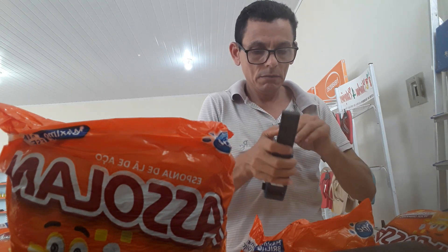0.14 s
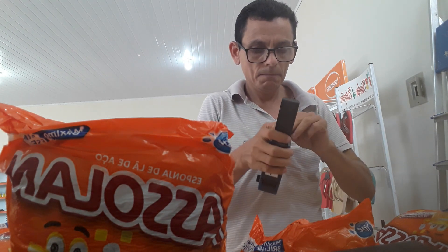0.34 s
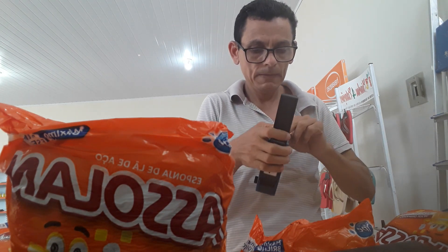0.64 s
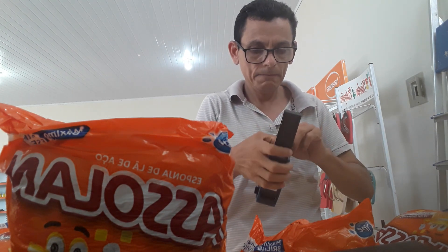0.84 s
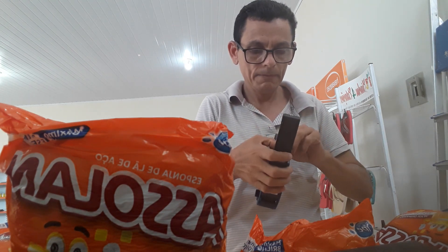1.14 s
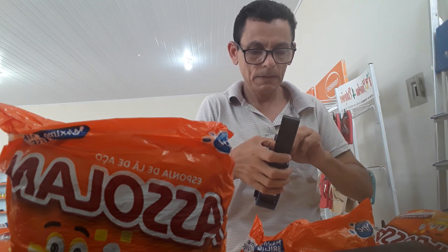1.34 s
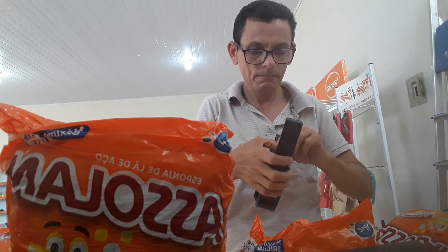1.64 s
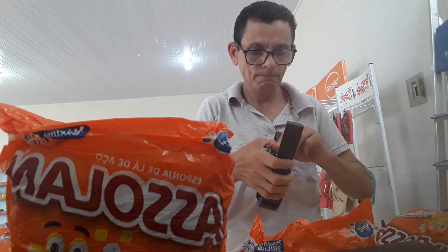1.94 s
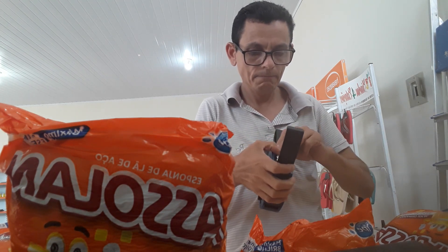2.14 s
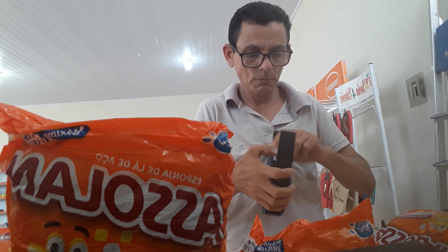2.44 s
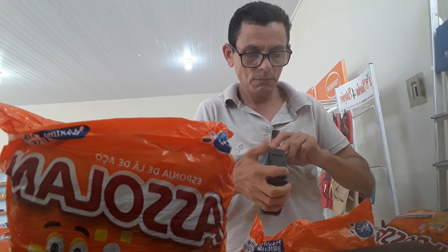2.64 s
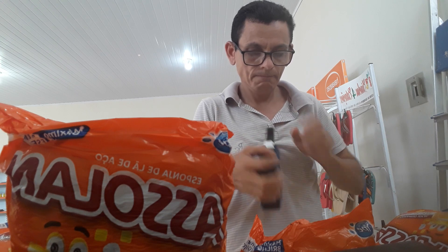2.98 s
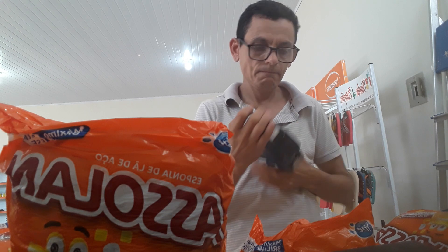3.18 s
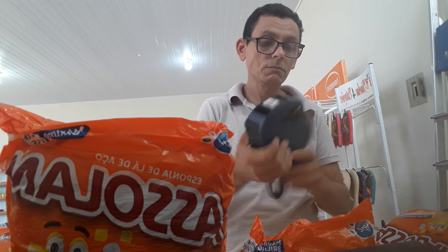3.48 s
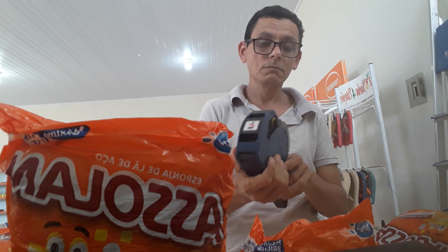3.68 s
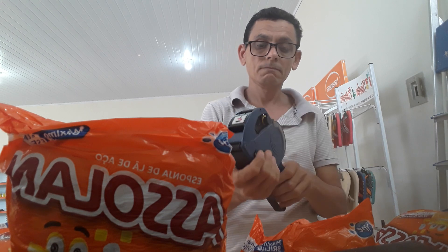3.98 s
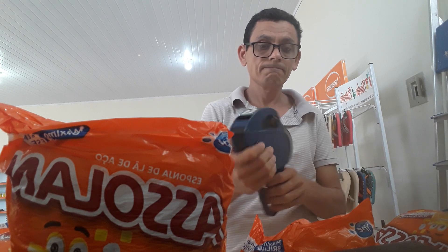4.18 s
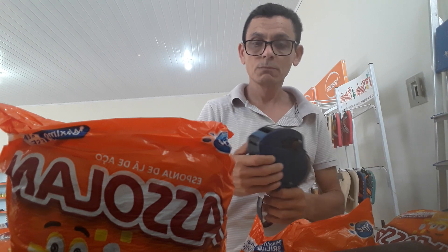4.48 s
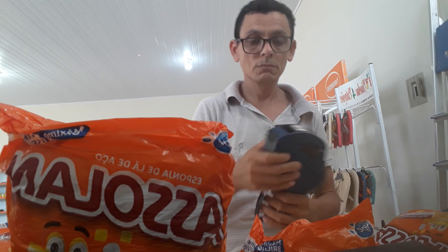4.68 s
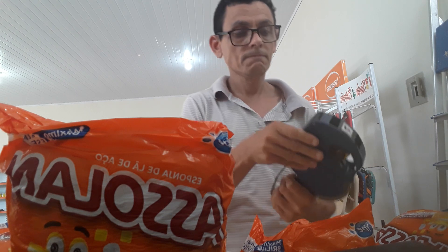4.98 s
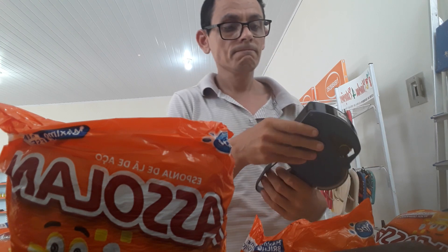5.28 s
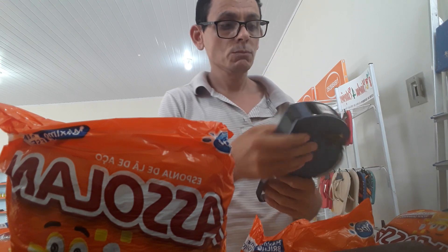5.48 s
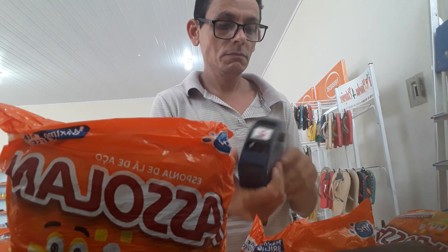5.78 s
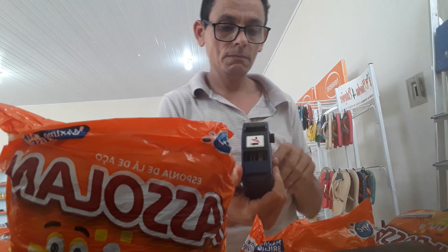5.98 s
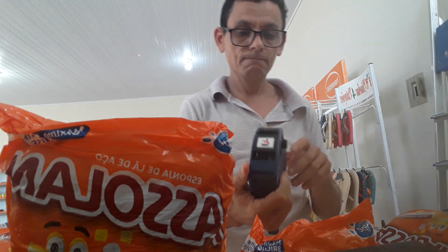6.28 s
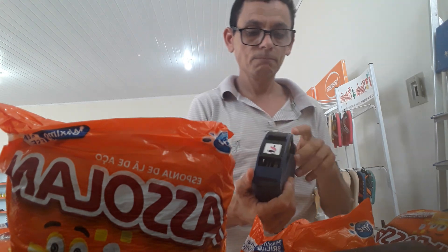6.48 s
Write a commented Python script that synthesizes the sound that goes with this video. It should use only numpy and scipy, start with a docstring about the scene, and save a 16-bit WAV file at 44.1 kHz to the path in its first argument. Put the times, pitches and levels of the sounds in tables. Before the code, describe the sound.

Light plastic clicks and two hard snaps from a handheld labeller indoors, while a small bird chirps and a car draws near outside.

```python
"""A plastic labelling gun is worked by hand in a small shop, over a steady rumble from the street.
A small bird starts to chirp, something whistles faintly far off, and the label roll ticks as it is pushed home.
At 2.9 s the casing snaps hard and sets a spring shivering; a few knocks follow as the gun is turned over.
At 5 s it snaps again. Each contact is a burst of chatter that rings the casing's modes.
Meanwhile a car draws near, its tyres roaring and hissing, and reaches the doorway at the end."""
import sys
import numpy as np
from scipy import signal
from scipy.fft import rfft, irfft, next_fast_len
from scipy.io import wavfile
from scipy.ndimage import uniform_filter1d, map_coordinates

SR = 44100
rng = np.random.default_rng(int(sys.argv[2]) if len(sys.argv) > 2 else 0)


def to_wav(sig):
    """Store sig (one row per channel, or 1-D mono) as 16-bit WAV at the path in sys.argv[1].

    Samples outside -1..1 are clipped; the rate is SR.
    """
    pcm = np.clip(np.atleast_2d(sig), -1, 1) * 32767
    pcm = np.round(pcm).astype(np.int16)
    wavfile.write(sys.argv[1], SR, pcm.T)  # frames by channels


N = 292030


def amp(db):
    """Decibels to gain."""
    return 10 ** (np.asarray(db) / 20)


def unit(x):
    """Scale to rms 1."""
    return x / np.sqrt(np.mean(x ** 2) + 1e-20)


def along(points, hz):
    """Interpolate (Hz, value) points on a log axis."""
    freqs, values = np.transpose(points)
    return np.interp(np.log(hz + 1), np.log(freqs), values)


def curves(rows, size=N):
    """One value per sample for each column after the time."""
    times, *columns = np.transpose(rows)
    return [np.interp(np.arange(size) / SR, times, column) for column in columns]


def wobble(knots_per_s, size=N):
    """A smooth random curve."""
    return map_coordinates(rng.standard_normal(size // 32 + 8), [np.arange(size) * knots_per_s / SR])


def filtered(x, response):
    """Filter x by a gain given as a function of Hz."""
    size = next_fast_len(len(x) + 8192)
    return irfft(rfft(x, size) * response(np.fft.rfftfreq(size, 1 / SR)), size)[:len(x)]


def resonances(modes, hz):
    """Summed power response of (Hz, width Hz, dB) modes."""
    return sum(amp(db) ** 2 / (1 + (2 * (hz - centre) / width) ** 2) for centre, width, db in modes)


def impulse_response(gain):
    """Minimum-phase pulse with this spectral shape and energy 1."""
    cepstrum = irfft(np.log(gain + 1e-6))
    half = len(cepstrum) // 2
    cepstrum[1:half] *= 2
    cepstrum[half + 1:] = 0
    pulse = irfft(np.exp(rfft(cepstrum)))
    return pulse / np.linalg.norm(pulse)


def add(track, start_s, sound):
    """Mix a sound into the track."""
    part = track[round(start_s * SR):][:len(sound)]
    part += sound[:len(part)]


def rush(spectrum, patchy_db):
    """Coloured noise of rms 1 with patches of random gain."""
    bins = signal.stft(rng.standard_normal(N), nperseg=512)[2]
    patches = uniform_filter1d(rng.standard_normal(bins.shape), size=4, axis=0)
    patches = uniform_filter1d(patches, size=16, axis=1)
    noise = signal.istft(bins * amp(patchy_db * unit(patches)), nperseg=512)[1][:N]
    return unit(filtered(noise, lambda hz: amp(along(spectrum, hz))))


# Each row: frequency in Hz, decay time to -60 dB in seconds.
ROOM_DECAY = [(200, 0.42), (1000, 0.85), (3000, 0.97), (7000, 0.74), (11000, 0.58), (16000, 0.27)]
# Each row: frequency in Hz, relative gain in dB.
ROOM_SPECTRUM = [(200, 14), (1000, 5.5), (3000, 2), (7000, -1.5), (10000, -1.5), (16000, 0)]


def room(x):
    """The shop's reverberation builds up, then each frequency dies at its own speed."""
    hz, t, bins = signal.stft(rng.standard_normal(SR), SR, nperseg=256)
    fade = amp(along(ROOM_SPECTRUM, hz)[:, None] - 60 * t / along(ROOM_DECAY, hz)[:, None])
    tail = signal.istft(bins * fade * (1 - np.exp(-t / 0.017)), SR, nperseg=256)[1]
    return signal.fftconvolve(x, tail / np.linalg.norm(tail))[:N]


def car_position_m():
    """The car's place along the road at steady speed; 0 is opposite the door."""
    speed_m_per_s, nearest_s = 10.8, 6.674
    return speed_m_per_s * (np.arange(N) / SR - nearest_s)


def in_doorway(reach_m=2.5):
    """1 while the car is heard straight through the door, 0 far from it."""
    return np.exp(-(car_position_m() / reach_m) ** 2)


def traffic_gain(steady_db, car_db, db_per_doubling, door_db):
    """One street layer: far traffic plus the car, which is fainter with distance and behind houses."""
    kerb_m, hidden_beyond_m = 3.5, 26.8
    distance_m = np.hypot(kerb_m, car_position_m())
    spreading_db = db_per_doubling * np.log2(distance_m / kerb_m)
    shielding_db = 7.5 * np.maximum(np.log2(distance_m / hidden_beyond_m), 0)
    car = amp(car_db - spreading_db - shielding_db + door_db * in_doorway())
    return np.hypot(amp(steady_db), car)


# Each row: frequency in Hz, relative density in dB.
RUMBLE_SPECTRUM = [(20, -46), (40, -13), (55, -7), (70, -21.5), (95, -5), (130, -2.5), (230, -3.5),
                   (310, -13), (500, -15.5), (1000, -47.5)]
# Each row: frequency in Hz, relative level in dB.
IDLE_TONES = [(70.5, -56.5)]


def engines():
    """Engines rumble outside; one idles with a wavering hum."""
    t = np.arange(N) / SR
    gain = traffic_gain(steady_db=-58.5, car_db=-45, db_per_doubling=3.5, door_db=-0.5)
    rumble = gain * rush(RUMBLE_SPECTRUM, patchy_db=0.24)
    drift = 1.1 * wobble(7)
    hum = sum(amp(db - 2.5 + 2.2 * wobble(2.54)) * np.sin(2 * np.pi * hz * t + drift)
              for hz, db in IDLE_TONES)
    return rumble + hum


# Tyre noise. Each row: frequency in Hz, relative density in dB.
ROAR_SPECTRUM = [(150, -15), (350, -6.5), (600, 1.5), (850, 0), (1200, 1), (1500, -3.5), (1900, -3),
                 (2300, -4), (2900, -9), (4000, -15), (8000, -49)]
HISS_SPECTRUM = [(1500, -4), (3200, 5), (4500, 5.5), (6300, 6.5), (7400, 2.5), (8600, -3), (9400, -16),
                 (11000, -10.5), (15500, -21)]
# Each row: centre in Hz, width in Hz, relative level in dB.
TREAD_MODES = [(1073, 17, 1), (1247, 48, 2.5), (1981, 71, 3), (2966, 90, -3.5)]


def tyres():
    """Tyres roar and hiss; the tread whines close by, and the top sizzle passes only through the door."""
    roar_gain = traffic_gain(steady_db=-64.5, car_db=-42.5, db_per_doubling=6, door_db=1.5)
    hiss_gain = traffic_gain(steady_db=-75.8, car_db=-50.3, db_per_doubling=5.5, door_db=6.5)
    nearness = np.clip((20 * np.log10(roar_gain) + 65.5) / 9, 0, 1)
    whine = unit(filtered(rng.standard_normal(N), lambda hz: resonances(TREAD_MODES, hz) ** 0.64))
    roar = rush(ROAR_SPECTRUM, patchy_db=0.45) + amp(-5) * nearness * whine
    hiss = rush(HISS_SPECTRUM, patchy_db=1.8)
    sizzle = rush([(7000, -25), (9500, 0), (11500, 0), (15500, -13)], patchy_db=3)
    return roar_gain * roar + hiss_gain * hiss + amp(-59.5) * in_doorway() * sizzle


# Each row: peak time in seconds, level in dB.
LOW_BUMPS = [(0.2, -51), (2.07, -53)]


def bumps(pitch_hz=117, half_length_s=0.048):
    """Two soft low bumps swell out of the rumble."""
    t = np.arange(N) / SR
    swell = sum(amp(db) * np.exp(-((t - s) / half_length_s) ** 2) for s, db in LOW_BUMPS)
    return swell * np.sqrt(2) * np.sin(2 * np.pi * pitch_hz * t + wobble(40))


# Each row: time in seconds, pitch in Hz, level in dB.
WHISTLE_CONTOUR = [(.68, 765, -110), (.79, 740, -65), (1.0, 732, -60.5), (1.15, 728, -63), (1.3, 706, -66),
                   (1.45, 713, -110)]


def whistle():
    """A distant whistle sags in pitch, with a weak octave."""
    hz, db = curves(WHISTLE_CONTOUR)
    phase = 2 * np.pi * np.cumsum(hz * (1 + 0.0041 * wobble(29.2))) / SR
    return amp(db) * (np.sin(phase) + 0.28 * np.sin(2 * phase))


# Each row: time into the chirp in seconds, pitch in Hz, gain in dB.
CHIRP_CONTOUR = [(0, 4496, -9), (.02, 4734, -2), (.04, 4660, 2.5), (.05, 3960, -1), (.07, 3920, -0.5),
                 (.09, 3555, -4), (.11, 3430, -15)]
# Each row: start in seconds, relative level in dB.
BIRD_CHIRPS = [(0.195, -62), (1.883, -58), (4.17, -62), (5.241, -60), (6.171, -58)]
# Each row: peak time in seconds, pitch in Hz, relative level in dB.
BIRD_PEEPS = [(1.61, 4580, -72), (3.8, 4600, -66)]


def bird():
    """A small bird repeats one raspy chirp that falls in steps, with soft peeps in between."""
    out, t = np.zeros(N), np.arange(N) / SR
    pitch_hz, shape_db = curves(CHIRP_CONTOUR, size=SR // 8)
    for s, db in BIRD_CHIRPS:
        rasp = 1 + 0.055 * wobble(900, len(pitch_hz))
        flutter_db = 3 * wobble(150, len(pitch_hz))
        phase = 2 * np.pi * np.cumsum(pitch_hz * rasp) / SR
        add(out, s, amp(db + shape_db + flutter_db) * np.sin(phase))
    for s, hz, db in BIRD_PEEPS:
        out += amp(db) * np.exp(-((t - s) / 0.023) ** 2) * np.sin(2 * np.pi * hz * t + wobble(250))
    return out


# Each row: start in seconds, level in dB, decay time to -60 dB in seconds.
SPRING_JOLTS = [(2.891, -33, 0.72), (4.974, -38, 0.77)]
# Each row: frequency in Hz, relative level in dB.
SPRING_MODES = [(810, -5), (875, -3), (930, 0), (980, 3), (1040, 6), (1100, -5), (1165, 2), (1220, -21),
                (1340, -1.5)]


def spring():
    """The jolted spring shivers in close, beating modes whose pitches jitter as it rattles in its seat."""
    out, t = np.zeros(N), np.arange(SR) / SR
    for s, db, t60_s in SPRING_JOLTS:
        ring = sum(amp(mode_db) * np.sin(2 * np.pi * hz * t + 1.6 * wobble(80, len(t)))
                   for hz, mode_db in SPRING_MODES)
        attack = 1 - np.exp(-t / 0.0017)
        add(out, s, amp(db - 60 * t / t60_s) * attack * unit(ring))
    return out


# Each row: start in seconds, level in dB, tilt in dB per octave, top-octave gain in dB.
ROLL_TICKS = [(1.187, -60, 9, -6), (1.250, -51.5, 5.5, -4), (1.352, -48, 2, -3), (1.422, -53.5, -0.5, 2),
              (1.568, -59.5, 0, 2), (1.823, -54.5, 2, 10), (1.847, -59, -2, -3), (2.6579, -30.5, 1.6, -4),
              (2.76, -41, -1, 0), (3.549, -50, 15, -12), (5.706, -47, -1, -6)]


def ticks():
    """The roll and its catch tick, stronger ticks rattling longer; the fingers add faint stray ones."""
    strays = [(s, -66.5, 11, -1) for s in rng.uniform(0.3, 2.6, size=10)]
    for s, db, tilt_db, top_db in ROLL_TICKS + strays:
        stretch = 2 ** ((db + 50.5) / 26)  # twice as long per 26 dB
        yield contact(s, db, tilt_db, top_db, chatter_s=0.0016 * stretch, t60_s=0.06 * stretch,
                      part_hz=6530, part_db=-13.5)


# Each row: start in seconds, level in dB, tilt in dB per octave, struck part's pitch in Hz, its gain in dB.
SHELL_KNOCKS = [(0.238, -46, -7.5, 2020, -2.5), (2.314, -50.5, -4.5, 2540, 2),
                (2.585, -52.5, -2.5, 2130, 4.5), (3.286, -43, -5.5, 1750, -0.5),
                (3.435, -39.5, -4, 1720, -1), (3.556, -47, -4, 2070, 2), (3.574, -40.5, -4.5, 1830, 3),
                (5.1198, -29.5, -3.5, 1560, 6)]


def knocks():
    """The shell knocks dully in the hands; a softer blow loses its top first."""
    for s, db, tilt_db, part_hz, part_db in SHELL_KNOCKS:
        yield contact(s, db, tilt_db, top_db=8.5 + 2 * tilt_db, chatter_s=0.003, t60_s=0.051,
                      part_hz=part_hz, part_db=part_db)


# Each row: start in seconds, level in dB, length in seconds, tilt in dB per octave,
# rubbed part's pitch in Hz, its gain in dB.
PLASTIC_SCRAPES = [(2.472, -56, 0.028, -1.5, 7800, -17), (2.589, -56, .03, -2, 8200, -16),
                   (2.848, -43, 0.012, 1, 6560, -10), (3.592, -48, .025, -3.5, 2104, -2.5),
                   (4.574, -65, 0.026, 0, 5960, 0), (4.767, -56.5, .035, -4, 5900, -13),
                   (4.9475, -22, .0067, 1.5, 2637, -4), (4.961, -24.5, 0.0051, 0.5, 5060, -3)]


def scrapes():
    """Plastic slides on plastic, chattering for the length of the slide."""
    for s, db, length_s, tilt_db, part_hz, part_db in PLASTIC_SCRAPES:
        yield contact(s, db, tilt_db, top_db=-0.5, chatter_s=length_s, t60_s=0.077,
                      part_hz=part_hz, part_db=part_db)


# Each row: start in seconds, level in dB, top-octave gain in dB, decay time to -60 dB in seconds,
# struck part's pitch in Hz, its gain in dB.
CASING_SNAPS = [(2.8895, -15.5, -0.5, .072, 2900, -15.5), (2.901, -28, 7, 0.028, 947, 7.5),
                (3.241, -26.5, -12.5, .04, 2785, -0.5), (4.972, -11, -4, .073, 1064, -11.5)]


def snaps():
    """The casing snaps hard, with a short, bright chatter."""
    for s, db, top_db, t60_s, part_hz, part_db in CASING_SNAPS:
        yield contact(s, db, tilt_db=0.95, top_db=top_db, chatter_s=0.037 * t60_s, t60_s=t60_s,
                      part_hz=part_hz, part_db=part_db)


# Each row: frequency in Hz, relative density in dB.
CASING_SPECTRUM = [(100, -20), (330, -12.5), (650, -9), (900, -3), (1400, -4.5), (2200, -2.5), (3000, -2),
                   (3800, -5), (5800, -3), (7400, -1), (9500, -11.5), (15500, -11)]
# Each row: centre in Hz, width in Hz, relative level in dB.
CASING_MODES = [(836, 59, -0.5), (974, 190, 0.5), (1133, 16, 5), (1715, 32, 5), (2060, 120, 4.5),
                (2940, 130, 2), (3960, 160, 0.5), (4770, 120, 2), (5900, 160, 1), (6750, 21, -11.5),
                (6750, 67, -1), (7300, 170, -5.5), (8820, 250, 0), (10860, 710, -1)]


def contact(start_s, db, tilt_db, top_db, chatter_s, t60_s, part_hz, part_db):
    """Parts rub, catch and chatter, ringing the casing. Returns direct sound and room feed; db is relative."""
    direct, room_feed = np.zeros(N), np.zeros(N)
    t, hz = np.arange(SR // 6) / SR, np.fft.rfftfreq(4096, 1 / SR)
    slope_db = tilt_db * np.log2(np.clip(hz, 700, 9000) / 3000)  # hard contacts are brighter
    shelf_db = top_db * along([(7200, 0), (10000, 1)], hz)
    colour = amp(along(CASING_SPECTRUM, hz) + slope_db + shelf_db)
    # The grip shifts each mode's strength.
    modes = [(centre, width, level + 2 * rng.standard_normal()) for centre, width, level in CASING_MODES]
    body = impulse_response(colour * np.sqrt(0.33 + resonances(modes, hz)))

    fade = amp(-60 * np.maximum(t - chatter_s, 0) / t60_s)
    strength = np.linalg.norm(fade)
    chatter = rng.standard_normal(len(t)) * amp(1.6 * wobble(840, len(t))) * fade
    chatter *= strength / np.linalg.norm(chatter)
    chatter[0] += 4.5  # the first hard touch
    ring = signal.fftconvolve(chatter, body)[:len(t)]
    part_phase = 2 * np.pi * part_hz * t + 1.74 * wobble(277, len(t))
    part_note = np.sqrt(2) * np.sin(part_phase) * fade * (1 - np.exp(-t / 0.00015))
    add(direct, start_s, amp(db - 0.5) * (ring + amp(part_db) * part_note))

    swell = np.linspace(0, 1, int(0.6 * chatter_s * SR) + 2)
    rub = swell * rng.standard_normal(len(swell))
    add(direct, start_s - len(rub) / SR, amp(db - 8.5) * signal.fftconvolve(rub, body))
    # Summed over all directions, the casing's spectrum is smoother.
    add(room_feed, start_s + chatter_s, amp(db) * strength * impulse_response(colour))
    return np.array([direct, room_feed])


def scene():
    """The gun is close and fairly dry, its spring shut in the casing; the bird comes in through the room."""
    direct, room_feed = sum(ticks()) + sum(knocks()) + sum(scrapes()) + sum(snaps())
    shiver, chirps = spring(), bird()
    gun = direct + shiver + amp(-10.5) * room(room_feed + amp(-3.5) * shiver)
    birdsong = amp(2.5) * chirps + amp(-3.5) * room(chirps)
    return (engines() + tyres() + bumps() + whistle() + birdsong + gun)[None]


# Each row: frequency in Hz, relative density in dB.
MIC_HISS_SPECTRUM = [(3000, 4), (7500, -3), (9500, -6.5), (11500, 2), (15500, 3.5)]


def record(dry, cutoff_hz=15950):
    """The microphone adds a faint hiss; a steep low-pass limits the band."""
    hiss = unit(filtered(rng.standard_normal(N), lambda hz: amp(along(MIC_HISS_SPECTRUM, hz))))
    return filtered(dry[0] + amp(-73) * hiss, lambda hz: 1 / (1 + (hz / cutoff_hz) ** 200))[None]


dry = scene()
out = record(dry)
to_wav(out)
```